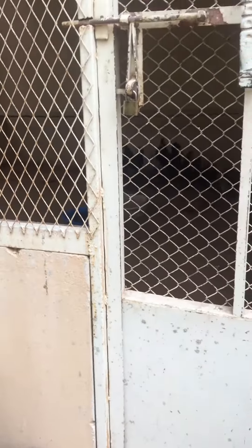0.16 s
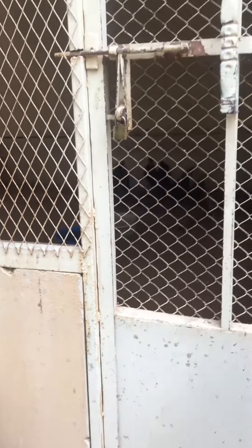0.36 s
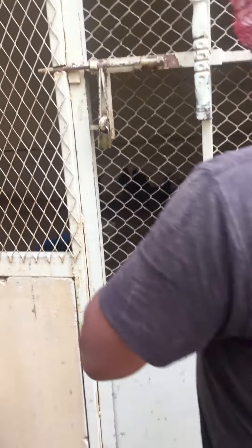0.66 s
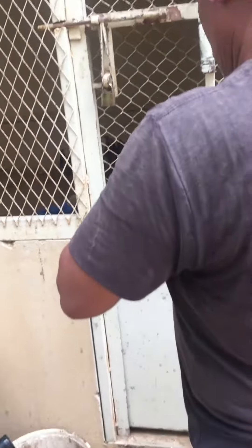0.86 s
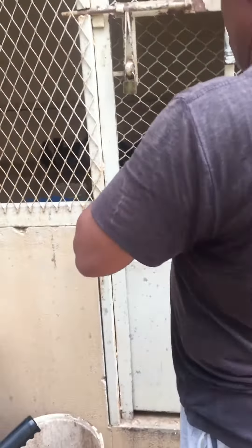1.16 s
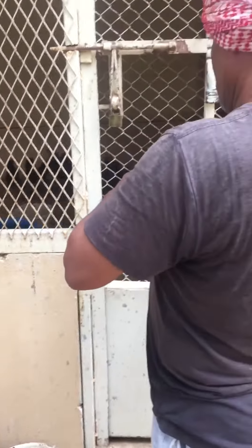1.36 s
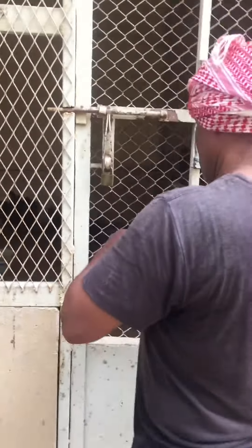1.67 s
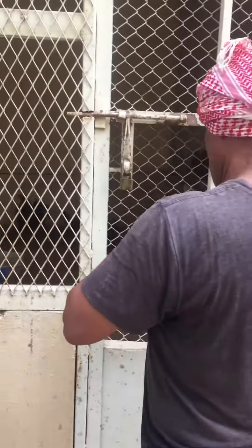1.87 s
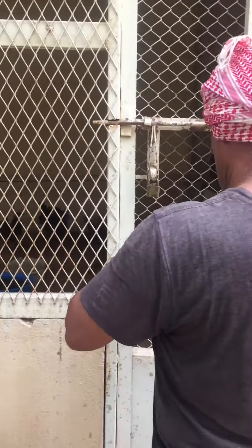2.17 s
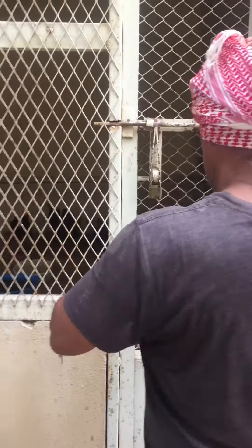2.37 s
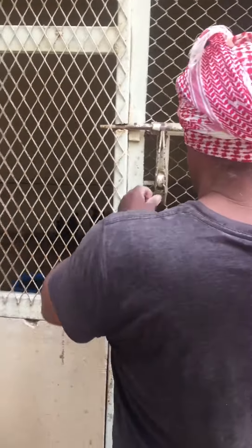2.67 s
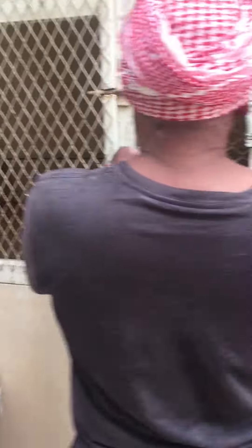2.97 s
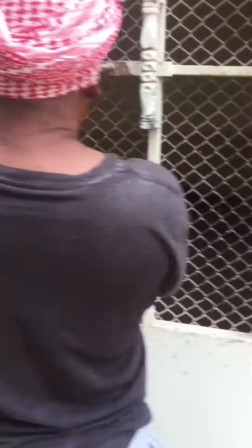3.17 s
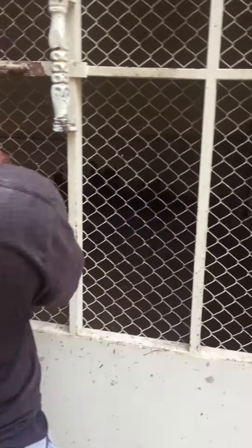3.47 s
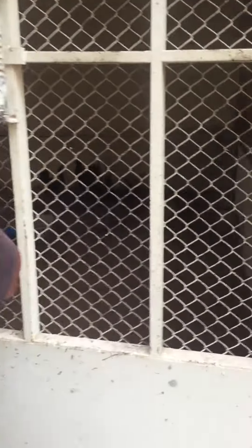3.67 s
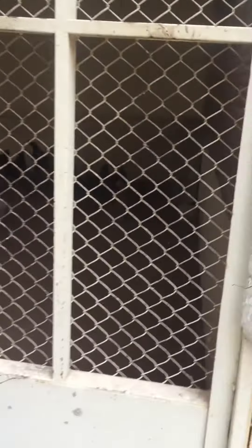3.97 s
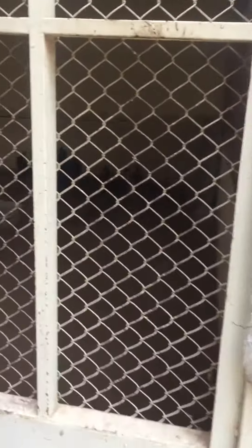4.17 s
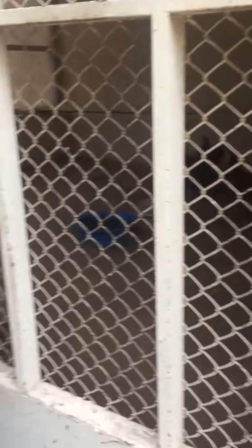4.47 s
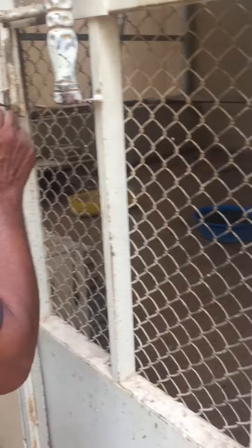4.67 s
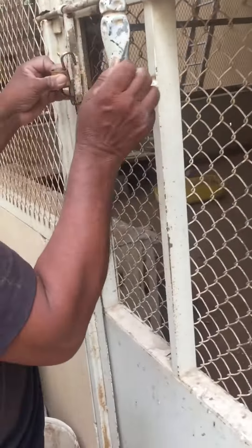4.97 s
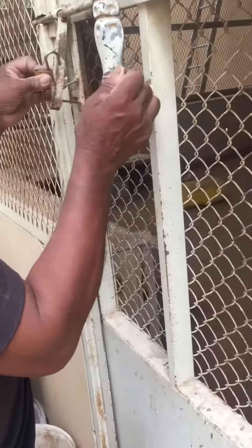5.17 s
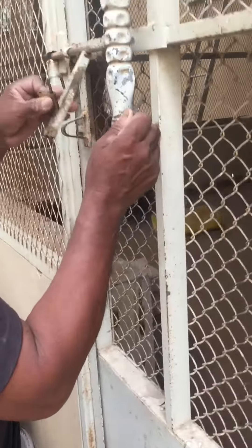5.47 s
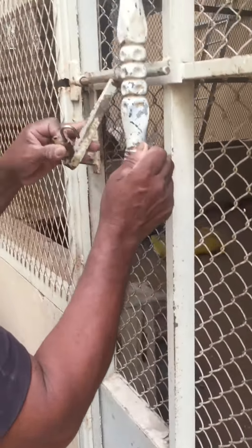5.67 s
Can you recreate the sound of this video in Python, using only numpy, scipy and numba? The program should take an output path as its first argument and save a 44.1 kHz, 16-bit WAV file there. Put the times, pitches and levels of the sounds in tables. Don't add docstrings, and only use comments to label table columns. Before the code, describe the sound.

A quiet farm yard with faint hiss and a light breeze rumbling low on the microphone. From 0 to 0.7 s a distant, hoarse rooster ends its crow while steel scrapes along wire, strongest near 0.5 s, with tiny high jingles and latch ticks. Short gliding sparrow whistles recur throughout. Hens begin with soft low clucks at 0.6 and 0.8 s, then sharper ones from 1.0 s. A short low squawk comes at 1.4 s; louder, higher squawks at 1.9 and 3.5 s each last about 0.3 s, starting hoarse, clearing, then cracking rough. Between and after them, low and high clucks alternate, ringing briefly off hard walls. Metal clicks at 1.3 and 2.3 s, then a hard bright clack with ringing at 4.3 s. Clucks continue to about 5.5 s, when a bolt breaks loose and drags, chattering and grating through its rusty guide, loudest near 5.65 s, slowing by 5.8 s.

```python
import sys
import numpy as np
from scipy import signal
from scipy.fft import rfft, irfft
from scipy.io import wavfile
from scipy.ndimage import uniform_filter1d
from numba import njit

SR = 44100
rng = np.random.default_rng(int(sys.argv[2]) if len(sys.argv) > 2 else 0)


def store_pcm(level_fs):
    pcm = np.round(np.clip(level_fs, -1, 1) * 32767).astype(np.int16)
    wavfile.write(sys.argv[1], SR, np.atleast_2d(pcm).T)


def linear_from_db(decibels):
    return 10 ** (np.asarray(decibels, float) / 20)


N = 256200

# time in seconds, gust level in dB.
GUSTS = [(0, -64.5), (.5, -64), (1.3, -63), (1.6, -67.5), (2.3, -64), (3.6, -63), (4.2, -62.5),
         (4.55, -60.5), (5.2, -63.5), (5.5, -61), (5.81, -59.5)]
# frequency in Hz, level in dB.
YARD_SPECTRUM = [(120, -30), (200, 0), (328, -18.5), (633, 4.5), (2230, -14.5), (3800, -4.5), (5500, -15),
                 (15800, -32)]
# start in seconds, length in seconds, pitch in Hz, level in dB,
# first partial over second in dB.
CROW_NOTES = [
    (0, 0.11, 722, -43.5, -9.5),
    (0.111, 0.053, 672, -46, -15),
    (0.161, 0.054, 725, -45.5, -10),
    (0.294, 0.1, 764, -46.5, -1.5),
    (0.46, 0.127, 774, -44.5, -4),
    (0.661, 0.065, 801, -52, -15),
]
# start in seconds, length in seconds, start pitch in Hz, end pitch in Hz, level in dB.
CHIRPS = [(0.012, 0.031, 6100, 3350, -58.5), (0.105, 0.04, 3690, 2790, -55),
          (0.363, 0.061, 4880, 3500, -53.5), (0.42, 0.028, 3820, 3030, -49.5),
          (0.724, 0.028, 6300, 5760, -57), (0.738, 0.042, 5600, 2600, -57), (0.8, 0.065, 4570, 4480, -65),
          (0.865, 0.018, 5250, 4050, -54.5), (0.879, 0.053, 3760, 2830, -55),
          (1.067, 0.022, 4030, 5220, -55), (1.086, 0.064, 3790, 3316, -52), (1.58, 0.03, 5700, 6080, -50),
          (1.618, 0.017, 5410, 4450, -42), (1.641, 0.0417, 3700, 3100, -50),
          (2.449, 0.025, 4100, 4990, -50), (2.476, 0.019, 4950, 3500, -50), (2.496, 0.024, 3500, 4020, -45),
          (2.52, 0.043, 3870, 2775, -49.5), (2.711, 0.02, 4730, 4750, -55), (2.73, 0.02, 4770, 3500, -50),
          (2.747, 0.056, 4000, 2915, -51), (2.862, 0.037, 4900, 4100, -51), (2.9, 0.054, 4200, 3460, -50),
          (3.015, 0.026, 4500, 4360, -57), (3.33, 0.036, 6400, 3040, -55.5),
          (3.294, 0.058, 3720, 3370, -57.5), (3.908, 0.025, 5200, 6100, -53),
          (3.94, 0.066, 5860, 5000, -52), (4.046, 0.03, 5040, 4200, -57), (4.092, 0.037, 5120, 3760, -50.5),
          (4.13, .065, 3600, 2835, -55), (4.333, 0.039, 6130, 4000, -52.5), (4.408, 0.019, 3640, 4370, -47),
          (4.958, 0.019, 4030, 4980, -53), (4.975, 0.032, 4150, 3410, -50),
          (5.009, 0.065, 3970, 2803, -50.5), (5.444, 0.066, 4780, 5750, -64),
          (5.69, 0.039, 5800, 4660, -52), (5.732, 0.084, 3890, 3600, -53)]
# start in seconds, ring in Hz, level in dB, t60 in seconds.
JINGLES = [(.011, 8700, -54, .08), (.011, 13200, -63, .06), (.09, 9600, -64, .15), (.113, 8900, -58, .08),
           (.14, 15400, -62, .06), (.228, 9300, -59.5, 0.072), (.228, 14000, -58, .08),
           (.232, 11300, -62, .06), (.33, 9600, -65, .2), (.411, 14200, -56, .06), (.432, 11300, -60, .12),
           (.452, 13600, -61, .08), (.476, 11300, -59, .06), (.515, 15300, -57, .2), (.518, 8900, -54, .1),
           (.53, 11300, -56, .1), (.568, 8800, -57, .08), (.575, 9600, -60, .15), (.69, 14200, -62, .1),
           (4.281, 9000, -47, 0.17), (4.281, 12000, -54, .2), (4.281, 2800, -38, .25),
           (4.42, 12700, -62, .12), (4.508, 11800, -63, .1), (5.15, 14500, -55, .1),
           (5.735, 8200, -53, .12), (5.79, 8100, -57, .08)]
# start in seconds, peak in dB, mid
# ring over treble in dB, crack centre in Hz.
TICKS = [(0.108, -46, -11, 8670), (0.227, -44.5, -33, 9500), (0.331, -60, 19.5, 6020),
         (0.4103, -41, -15, 13900), (0.4887, -41, 8, 5840), (1.1606, -43, 6, 8810), (1.1832, -46, -7, 9700),
         (1.291, -35.5, 6.5, 9400), (1.308, -37, 1.5, 11200), (2.267, -36, 8, 6350),
         (2.2795, -30, -34, 6000), (2.4779, -55.5, 21, 6850), (2.95, -50, 5, 11800),
         (3.099, -54.5, 7.5, 6150), (4.2844, -22.5, 0, 7130), (4.437, -57, 19.5, 6000),
         (4.4913, -62, 23, 6050), (4.52, -54, 20, 6000), (4.556, -38, 18.5, 6800),
         (4.843, -41.5, -2.5, 7060), (5.087, -58, 9, 5730), (5.15, -64, 5, 7000), (5.243, -58.5, 24, 6000),
         (5.5572, -55, 10, 6000), (5.5903, -50, 15, 6000), (5.6033, -39, 25, 6350),
         (5.635, -22.5, -22, 6500), (5.65, -46, 7, 6460)]
# frequency in Hz, level in dB, t60 in seconds.
LATCH_MODES = [(2446, 20, 0.023), (2777, 5.5, 5.0), (3500, -27, 5.0), (4370, 10.5, 0.42), (5250, 2, 5.0),
               (5760, 10, 0.11), (7060, -14, 0.16), (9500, -40, 0.13), (12200, -64, 0.062),
               (11990, -80, 0.082)]
# peak time in seconds, level in dB, swell in seconds, fade in seconds,
# body over treble in dB.
SCRAPES = [(.01, -45.5, .03, 0.055, -7), (0.108, -49, 0.037, 0.11, -2.5), (0.227, -53, 0.026, 0.014, -1),
           (.344, -46.5, 0.04, 0.14, -1.5), (0.505, -31, 0.051, 0.058, -14.5),
           (0.53, -41, 0.03, 0.18, -10.5), (0.695, -44.5, 0.11, 0.069, -9.5),
           (0.749, -51.5, 0.026, 0.079, -23), (1.192, -52.5, 0.075, 0.083, 8),
           (1.292, -35, 0.016, 0.014, -13), (1.714, -46.5, 0.054, 0.054, -5),
           (1.84, -40.5, 0.016, 0.19, -8.5), (3.444, -48, 0.041, 0.11, -8.5),
           (3.884, -48.5, 0.37, 0.027, 4.5), (3.913, -63.5, 0.032, 0.35, 10),
           (4.282, -46, 0.018, 0.13, 9.5), (4.495, -53.5, 0.034, 0.31, 13), (4.561, -45, 0.054, 0.13, 7.5),
           (4.849, -61, 0.06, 0.57, 4), (5.092, -57.5, 0.024, 0.01, 14.5), (5.155, -56, 0.17, 0.018, 10.5)]
# centre in Hz, width in Hz, level in dB.
SCRAPE_BODY = [(300, 100, -16), (1570, 1380, 5), (4500, 1100, -55)]
# centre in Hz, width in Hz, level in dB.
SCRAPE_TOP = [(6700, 63000, 6.5), (9080, 150, 13), (11500, 1200, 5), (14700, 3600, 8.5)]
# time in seconds, level in dB, treble tilt in dB.
BOLT_DRAG = [
    (5.5, -54, 10),
    (5.56, -24, 1.5),
    (5.6, -23, 6.5),
    (5.654, -20.5, 7),
    (5.71, -27.5, 0.5),
    (5.81, -46.5, 2.5),
]
# frequency in Hz, level in dB.
BOLT_SPECTRUM = [(88, -22), (150, -12), (455, -21), (610, -3.5), (1550, -7), (2250, -9.5), (4700, -22.5),
                 (15800, -48.5)]
# centre in Hz, width in Hz, level in dB.
BOLT_RINGS = [(694, 600, -10), (1530, 210, -2), (2390, 310, -6), (4200, 470, -22)]
# centre in Hz, width in Hz, level in dB.
BEAK = [(2775, 525, -2), (3700, 350, -3.5), (4200, 380, -9.5), (5630, 700, -11.5), (6300, 1140, -12.5),
        (9060, 3300, -24), (11300, 9400, -29)]
# start in seconds, length in seconds, pitch in Hz, level in dB, roughness 0-1.
LOW_CLUCKS = [(.622, 0.045, 300, -42.5, 0.2), (.821, 0.048, 288.4, -42.5, 1), (1.674, 0.04, 300, -42, 0.35),
              (2.312, 0.049, 276.5, -42, 0.03), (2.548, 0.048, 300, -42, 0.55),
              (2.762, 0.05, 335.6, -42, 0.3), (2.932, 0.024, 369, -37, 0.35),
              (3.012, 0.039, 343, -41, 0.02), (3.14, 0.046, 426, -43, 0.05), (3.375, 0.14, 300, -51, 0.9),
              (3.86, 0.042, 293.3, -45, 0.17), (4.042, 0.056, 344.5, -41, 0.12),
              (4.199, 0.11, 374.7, -41.5, 0.31), (4.401, 0.055, 373.4, -37, 0.47),
              (4.781, 0.042, 388.6, -36, 0.2), (4.985, 0.048, 365.6, -38.5, 0.08)]
# chest in dB, beak in dB, throat in Hz.
LOW_TRACTS = [(-1, 2, 810), (-1, 6, 970), (3, 2, 990), (-3, 7, 1040), (-2, -1.5, 1020), (1, 2, 1030),
              (3, 8.5, 1240), (3.5, 9, 1130), (-7, -9, 1250), (-9, 6, 1200), (-1, 3, 970), (-18, -3, 840),
              (-0.5, -7, 1060), (-1, 4, 940), (0, -20, 960), (-5, -9, 960)]
# start in seconds, length in seconds, pitch in Hz, level in dB, roughness 0-1.2.
HIGH_CLUCKS = [(1.029, 0.075, 611, -44, 1.2), (1.09, 0.043, 606, -38, 1.1), (1.14, 0.044, 641, -48, 0.8),
               (1.244, 0.07, 553.4, -45, 0.54), (1.53, 0.022, 476, -53, 0.03),
               (1.536, 0.051, 722, -35.5, 0.36), (1.828, 0.067, 566.6, -34, 0.45),
               (2.343, 0.057, 680.3, -29.5, 0.23), (2.58, 0.055, 623, -32, 0.24),
               (3.215, 0.057, 536, -31, 0.14), (3.392, 0.092, 634.4, -32.5, 0.49),
               (3.955, 0.074, 677.4, -31, 0.16), (4.575, 0.068, 546, -32.5, 0.19),
               (5.234, 0.076, 554.4, -31.5, 0.54), (5.468, 0.076, 592, -31, 0.67)]
# chest in dB, beak in dB, throat in Hz, mouth in Hz, strong-weak alternation 0-1.
HIGH_TRACTS = [(4, -17, 1080, 1360, 0), (-15, 7.5, 960, 1900, 0.2), (-3, 17, 1660, 2200, 0.1),
               (7, 0, 1130, 1660, 0.2), (-2, 0, 1500, 2450, .03), (-5, -3, 1380, 2000, 0.4),
               (1.5, 6, 1140, 1990, 0.14), (6, 1, 1120, 2130, 0.03), (2, 3.5, 1120, 2390, 0.06),
               (-1.5, 2, 1110, 1950, 0), (3.5, 3, 1070, 2220, 0.35), (-0.5, 1, 1080, 2140, 0.04),
               (0.5, 4.5, 1050, 2180, 0.12), (4.5, -1.5, 1210, 2127, 0.2), (0.5, -1, 1110, 2200, 0)]
HIGH_ONSET_DB = [-7, 3, -4, -4, -4, 1, -9, -1, -5, -2, -14, -15, -2, 2, -7]
HIGH_UPPER_DB = [-12, -7, -12, -12, -12, -6, -10, -5, -33, -11, -7, -10, -5, -3, -9]
# time in seconds, pitch in Hz, level in dB.
SQUAWKS = [
    [(1.362, 451, -61), (1.378, 472, -38), (1.393, 493, -35), (1.43, 483.5, -34.5), (1.484, 496.8, -32.5),
     (1.522, 493.3, -32.5), (1.545, 477.4, -35), (1.575, 450, -43), (1.6, 443, -59)],
    [(1.898, 691, -39), (1.916, 703.3, -24.5), (1.968, 713.2, -29), (2.01, 699.2, -30),
     (2.042, 692.3, -28.5), (2.065, 647.5, -29.5), (2.134, 653.3, -28.5), (2.172, 697, -33),
     (2.21, 727, -54.5)],
    [(3.49, 661, -53), (3.51, 683.7, -26), (3.534, 714, -24.5), (3.572, 722, -26.5), (3.604, 679, -28.5),
     (3.641, 653.8, -28), (3.715, 651, -28.5), (3.765, 704, -31), (3.81, 716, -54)],
]
# clears at seconds, cracks at seconds, strong-weak alternation at the start 0-1.5,
# mouth in Hz, beak in dB.
SQUAWK_STAGES = [(1.38, 1.59, 0, 2345, -1.5), (1.978, 2.032, 1.1, 2030, -0.6),
                 (3.548, 3.607, 0.46, 2085, -1.5)]
# throat width in Hz, mouth width in Hz, cracked mouth in Hz, chest in dB,
# hoarseness of the start 0-1.
SQUAWK_TRACTS = [(430, 470, 3600, 0.5, 0.3), (614, 500, 2010, 3.5, 0.25), (600, 220, 1940, 3.5, 0.22)]
# pitch in Hz, level in dB, roughness 0-1.
SECOND_VOICES = [(450, -20, .3), (620, -5, 0.14), (612.7, -2, 0.11)]
# extra at the onset in dB, lasting in dB.
SQUAWK_SHINE = [(-6.5, -1.5), (8.5, -3), (9, -3.5)]
CLEAR_ROUGH = [.09, .06, .13]

HIGH_BELLY_DB, LOW_BELLY_DB = -9.5, -5.5
HIGH_BEAK_DB, LOW_BEAK_DB, USUAL_CLUCK_DB = -7.5, -7, -31.5
BEAK_DB_PER_DB, BEAK_DB_PER_ROUGH = 1.45, 3
LOW_ONSET_DB, LOW_UPPER_DB, LOW_MOUTH_HZ, LOW_ALTERNATE = -7, -20, 2320, 0.03
REST_THROAT_HZ, CLEARING_S, CRACKING_S, SHINE_FADE_S = 1140, 0.02, 0.012, 0.054
HOARSE_BEAK_DB, CRACKED_BEAK_DB = 0.27, -1.37
CRACKED_ROUGH, CRACKED_ALTERNATE, CRACKED_WIDTH_HZ = 0.57, 0.65, 400
SECOND_WIDTH_HZ, SECOND_ALTERNATE = 300, 0.2


def level(x, db=0):
    return x * linear_from_db(db) / np.sqrt(np.mean(x ** 2) + 1e-18)


@njit
def svf(x, hz, width):
    y, b, l = np.empty(len(x)), 0., 0.
    for i in range(len(x)):
        g, k = np.tan(np.pi * hz[i] / SR), width[i] / hz[i]
        v = (b + g * (x[i] - l)) / (1 + g * (g + k))
        b, l, y[i] = 2 * v - b, l + 2 * g * v, k * v
    return y


def band(x, hz, width):
    return svf(x, np.clip(hz + np.zeros(len(x)), 20, 0.45 * SR), width + np.zeros(len(x)))


def band2(x, hz, width):
    return band(band(x, hz, width), hz, width)


def flutter(n, rate_hz):
    k = max(int(SR / rate_hz), 1)
    steps = np.repeat(rng.standard_normal(n // k + 1), k)[:n]
    return level(uniform_filter1d(steps, k))


def coloured(n, spectrum):
    hz, db = np.transpose(spectrum)
    f = np.maximum(np.fft.rfftfreq(n, 1 / SR), 1)
    gain = linear_from_db(np.interp(np.log(f), np.log(hz), db))
    return level(irfft(rfft(rng.standard_normal(n)) * gain, n))


def times(length_s):
    return np.arange(int(length_s * SR)) / SR


def add(out, s, x):
    i = int(s * SR)
    out[i:i + len(x)] += x[:N - i]


def read(table):
    s, *columns = np.transpose(table)
    t = np.arange(s[0], s[-1], 1 / SR)
    edge = np.clip(np.minimum(t - s[0], s[-1] - t) / 0.002, 0, 1)
    return s[0], t, [np.interp(t, s, c) for c in columns], edge


def room(x, t60_s, treble_t60_s, wet_db):
    t = times(0.7)
    noise = rng.standard_normal((2, len(t))) * np.clip(t / 0.00092, 0, 1)
    low = band(noise[0], 870, 2120) * linear_from_db(-60 * t / t60_s)
    tail = low + 0.5 * band(noise[1], 4430, 4260) * linear_from_db(-60 * t / treble_t60_s)
    response = 1 + linear_from_db(wet_db) * rfft(tail / np.sqrt(np.sum(low ** 2)))
    power = np.abs(response) ** 2
    response = response * np.sqrt(uniform_filter1d(power, size=900) / uniform_filter1d(power, size=90))
    lead = len(t) // 30
    return signal.fftconvolve(x, np.roll(irfft(response, len(t)), lead))[lead:lead + N]


def air():
    s, t, (gust_db,), _ = read(GUSTS)
    n = len(t)
    noise = rng.standard_normal((2, n))
    low = level(band2(noise[0], 62, 70)) * linear_from_db(2.5 * flutter(n, 14) + 1.25 * flutter(n, 6))
    upper = level(band2(noise[1], 232, 300)) * linear_from_db(2.7 * flutter(n, 12))
    upper_db = -2 + 4.5 * (gust_db - gust_db.mean())
    out = coloured(N, YARD_SPECTRUM) * linear_from_db(-62 + 2.5 * flutter(N, 5))
    add(out, s, linear_from_db(gust_db) * (low + linear_from_db(upper_db) * upper))
    return out


def rooster():
    out = np.zeros(N)
    for s, length, hz, db, first_db in CROW_NOTES:
        t = times(length)
        n = len(t)
        wobble = 0.0328 * np.exp(-s / 0.53)
        shape = np.clip(np.minimum(t / 0.004, (length - t) / 0.017), 0, 1) * linear_from_db(-46 * t)
        jitter = wobble * (flutter(n, 40) + 0.6 * flutter(n, 200))
        phase = 2 * np.pi * np.cumsum(hz * (1 - 0.03 * np.exp(-t / 0.02) + jitter)) / SR
        rasp = 20 * wobble * np.sin(1.8 * phase) * linear_from_db(1.4 * flutter(n, 44))
        partials = np.sin(2 * phase) + rasp + linear_from_db(first_db) * np.sin(phase)
        add(out, s, linear_from_db(db) * shape * partials * linear_from_db(3.5 * flutter(n, 57.7)))
    return out


def sparrows():
    out = np.zeros(N)
    for s, length, start_hz, end_hz, db in CHIRPS:
        t = times(length)
        n = len(t)
        warble = 0.58 * max(length, 0.065)
        buzz = np.sin(2 * np.pi * np.cumsum(45 + 12 * flutter(n, 31.3)) / SR) + 0.53 * flutter(n, 400)
        glide_hz = start_hz * (end_hz / start_hz) ** ((t / length) ** 0.8)
        hz = glide_hz * (1 + 0.85 * warble * buzz)
        breaks = linear_from_db(86 * warble * flutter(n, 99) + 3.5 * flutter(n, 251))
        shape = np.sin(np.pi * t / length) ** 0.17 * breaks
        phase = 2 * np.pi * np.cumsum(hz) / SR
        second = 3 * warble * np.sin(0.8 * phase)
        hiss = 0.28 * level(band(rng.standard_normal(n), hz, 470))
        add(out, s, linear_from_db(db + 5.5) * shape * (np.sin(phase) + second + hiss))
    return out


def jingles():
    out, t = np.zeros(N), times(0.2)
    n = len(t)
    for s, hz, db, t60 in JINGLES:
        phase = 2 * np.pi * hz * np.cumsum(1 + 0.008 * flutter(n, 300)) / SR
        ring = np.sin(phase) * linear_from_db(3 * flutter(n, 150))
        add(out, s, linear_from_db(db - 60 * t / t60) * np.clip(t / 0.0018, 0, 1) * ring)
    return out


def scrapes():
    out = np.zeros(N)
    for peak, peak_db, swell, fade, body_db in SCRAPES:
        quiet_db = peak_db - 30
        stroke = [(max(peak - swell, 0), quiet_db), (peak, peak_db), (peak + fade, quiet_db)]
        s, t, (db,), edge = read(stroke)
        n = len(t)
        grit = rng.standard_normal(n) * linear_from_db(2.9 * flutter(n, 250.6) + 2.6 * flutter(n, 59.3))
        body = sum(linear_from_db(g) * level(band(grit, f, w)) for f, w, g in SCRAPE_BODY)
        top = sum(linear_from_db(g + 0.63 * flutter(n, 33)) * band(grit, f, w) for f, w, g in SCRAPE_TOP)
        add(out, s, linear_from_db(db - 2.5) * edge * (level(top) + linear_from_db(body_db) * body))
    return out


def latch_ticks():
    out, t = np.zeros(N), times(0.25)
    for s, db, ring_db, crack_hz in TICKS:
        noise = rng.standard_normal(len(t))
        crack = level(band2(noise, crack_hz, 7000))
        crack = crack * (linear_from_db(-60 * t / 0.025) + 0.3 * linear_from_db(-60 * t / 0.11))
        knock = level(band(band(noise, 2900, 5000), 3650, 2000)) * linear_from_db(-60 * t / 0.091)
        rings = 0
        for hz, mode_db, t60 in LATCH_MODES:
            strength, detune = rng.standard_normal(2)
            ring = np.sin(2 * np.pi * hz * (1 + 0.021 * detune) * t)
            rings = rings + linear_from_db(mode_db + 1.3 * strength) * ring * linear_from_db(-60 * t / min(t60, 0.07))
        add(out, s, linear_from_db(db - 4) * (crack + linear_from_db(ring_db) * (0.72 * knock + 0.081 * rings)))
    return out


def bolt():
    s, t, (db, tilt_db), edge = read(BOLT_DRAG)
    n = len(t)
    grit = coloured(n, BOLT_SPECTRUM) * linear_from_db(1.8 * flutter(n, 120) + 2.5 * flutter(n, 600))
    rings = sum(linear_from_db(g + 5.4 * flutter(n, 44)) * band(grit, f, w) for f, w, g in BOLT_RINGS)
    grit = grit + 0.8 * rings
    low = signal.sosfilt(signal.butter(2, 3500, fs=SR, output="sos"), grit)
    out = np.zeros(N)
    add(out, s, linear_from_db(db - 6.5) * edge * (low + linear_from_db(tilt_db) * (grit - low)))
    return out


def voice(hz, rough, alternate, throat_hz, mouth_hz, beak_db, chest_db=0, belly_db=HIGH_BELLY_DB,
          mouth_width_hz=480, throat_width_hz=547, shine_db=0, upper_db=-30):
    n = len(hz)
    jitter = 0.006 * flutter(n, 60) + 0.045 * rough * flutter(n, 500)
    phase = 2 * np.pi * np.cumsum(hz * (1 + jitter)) / SR
    k = np.arange(1, int(15500 / hz.max()) + 1)[:, None]
    pulses = level(np.cos(k * phase).sum(axis=0))
    pulses = pulses * (1 + alternate * np.cos(phase / 2)) * linear_from_db(7.1 * rough * flutter(n, 300))
    breath = rng.standard_normal(n) * (1 + np.cos(phase))
    source = pulses + 1.49 * rough * breath
    chest = linear_from_db(chest_db - 6) * band(band(source, 588, 360), 603, 310)
    belly = linear_from_db(belly_db) * band2(source, 360, 310)
    throat = band2(source, throat_hz, throat_width_hz)
    mouth = band2(source, mouth_hz, mouth_width_hz)
    upper = band(band(source, 1.198 * mouth_hz, 350), 1.21 * mouth_hz, 350)
    mouth = mouth - linear_from_db(upper_db) * upper
    top = 0
    for f, w, db in BEAK:
        hissing = source + 0.22 * (f / 5000) ** 2 * breath
        gain_db = db + 3.15 * flutter(n, 26.5) + 0.84 * beak_db * np.log2(f / 3000) + shine_db * (f > 5000)
        top = top + linear_from_db(gain_db) * band2(hissing, f, w)
    out = chest + belly - throat + linear_from_db(beak_db) * mouth - linear_from_db(2.8 * beak_db) * top
    out = signal.sosfilt(signal.butter(4, 0.88 * hz.min(), "high", fs=SR, output="sos"), out)
    return out / np.sqrt(uniform_filter1d(out ** 2, size=1500) + 1e-9)


def cluck(note, tract, onset_db, upper_db, swell, rest_db, belly_db):
    _, length, hz, db, rough = note
    chest_db, open_db, rest_throat_hz, mouth_hz, alternate = tract
    t = times(length)
    shape = np.clip(t / 0.022, 0, 1) ** swell * np.clip((length - t) / 0.02, 0, 1)
    scoop = np.exp(-(t / 0.01885) ** 2)
    sag = 0.045 * (t / length) ** 3
    beak_db = rest_db + BEAK_DB_PER_DB * (db - USUAL_CLUCK_DB) + BEAK_DB_PER_ROUGH * rough + open_db
    sound = voice(hz * (1 - 0.22 * scoop - sag), np.clip(rough + 0.35 * scoop, 0, 1), alternate,
                  rest_throat_hz * (1 - 0.18 * scoop), mouth_hz * (1 - 0.06 * scoop),
                  min(beak_db, 0) + onset_db * scoop, chest_db - 3 * scoop, belly_db, upper_db=upper_db)
    return linear_from_db(db) * shape * sound


def clucks():
    out = np.zeros(N)
    for note, tract, onset_db, upper_db in zip(HIGH_CLUCKS, HIGH_TRACTS, HIGH_ONSET_DB, HIGH_UPPER_DB):
        add(out, note[0], cluck(note, tract, onset_db, upper_db, 1.1, HIGH_BEAK_DB, HIGH_BELLY_DB))
    for note, tract in zip(LOW_CLUCKS, LOW_TRACTS):
        tract = (*tract, LOW_MOUTH_HZ, LOW_ALTERNATE)
        add(out, note[0], cluck(note, tract, LOW_ONSET_DB, LOW_UPPER_DB, 1.8, LOW_BEAK_DB, LOW_BELLY_DB))
    return out


def squawks():
    out = np.zeros(N)
    for contour, stages, tract, second, shine, clear_rough in zip(
            SQUAWKS, SQUAWK_STAGES, SQUAWK_TRACTS, SECOND_VOICES, SQUAWK_SHINE, CLEAR_ROUGH):
        clears, cracks, doubling, mouth_hz, beak_db = stages
        throat_width_hz, width_hz, cracked_hz, chest_db, hoarse = tract
        s, t, (hz, db), edge = read(contour)
        start = (1 - np.tanh((t - clears) / CLEARING_S)) / 2
        cracked = (1 + np.tanh((t - cracks) / CRACKING_S)) / 2
        clear = 1 - np.maximum(start, cracked)
        rough = hoarse * start + clear_rough * clear + CRACKED_ROUGH * cracked
        throat_hz = REST_THROAT_HZ + (2 * hz - REST_THROAT_HZ) * clear
        first = voice(hz, rough, doubling * start + CRACKED_ALTERNATE * cracked, throat_hz,
                      mouth_hz + (cracked_hz - mouth_hz) * cracked,
                      beak_db + HOARSE_BEAK_DB * start + CRACKED_BEAK_DB * cracked, chest_db,
                      mouth_width_hz=width_hz + (CRACKED_WIDTH_HZ - width_hz) * cracked,
                      throat_width_hz=throat_width_hz,
                      shine_db=shine[0] * np.exp(-(t - s) / SHINE_FADE_S) + shine[1])
        add(out, s, linear_from_db(db) * edge * first)
        low_hz, low_db, low_rough = second
        other = voice(low_hz * (1 + 0.012 * flutter(len(t), 15)), low_rough, SECOND_ALTERNATE,
                      1.62 * low_hz, 3 * low_hz, -2.6, -13, mouth_width_hz=SECOND_WIDTH_HZ,
                      throat_width_hz=SECOND_WIDTH_HZ, shine_db=-11)
        add(out, s, linear_from_db(db + low_db) * edge * cracked * other)
    return out


def scene():
    yard = room(rooster() + sparrows(), t60_s=0.26, treble_t60_s=0.26, wet_db=-1)
    knocks = signal.sosfilt(signal.butter(1, 9000, fs=SR, output="sos"), scrapes() + latch_ticks())
    steel = 0.36 * (knocks + bolt() + linear_from_db(3.5) * jingles())
    hens = linear_from_db(1) * (clucks() + squawks())
    coop = room(hens + steel, t60_s=0.27, treble_t60_s=0.29, wet_db=-7.5)
    return (air() + linear_from_db(-6) * yard + steel + coop)[None, :]


def low_pass(x):
    return signal.sosfilt(signal.butter(12, 15960, fs=SR, output="sos"), x)


def record(dry):
    mix = signal.sosfilt(signal.butter(4, 38, "high", fs=SR, output="sos"), dry)
    mix = signal.sosfilt(signal.ellip(10, 0.2, 70, 15900, fs=SR, output="sos"), mix)
    return low_pass(mix)


dry = scene()
out = record(dry)
store_pcm(out)
```